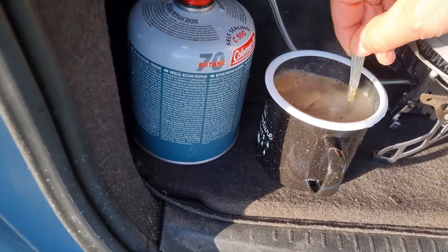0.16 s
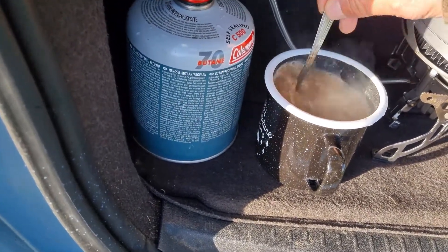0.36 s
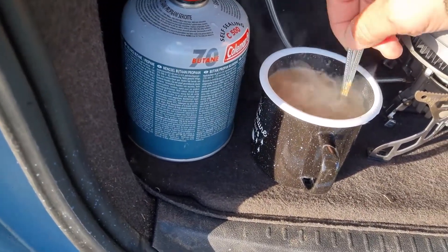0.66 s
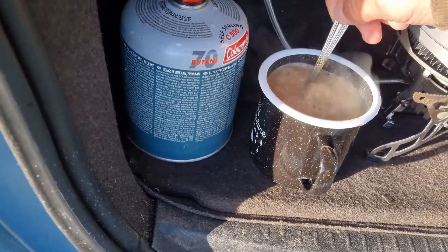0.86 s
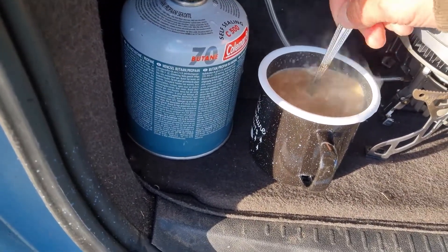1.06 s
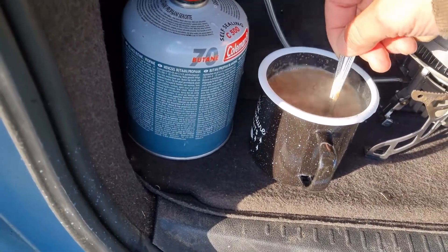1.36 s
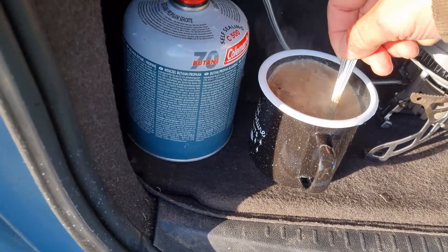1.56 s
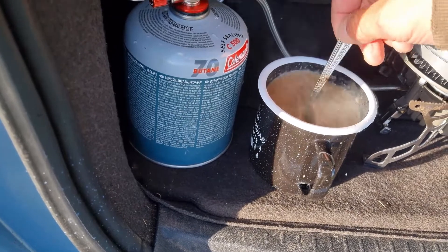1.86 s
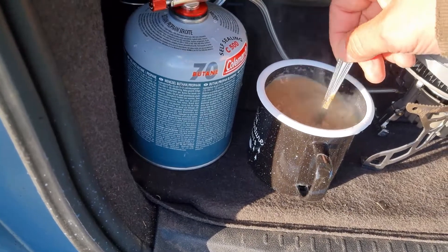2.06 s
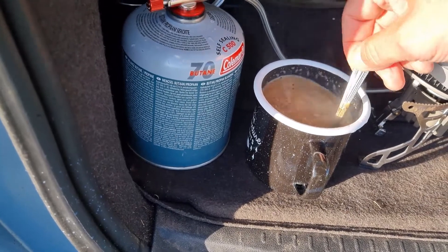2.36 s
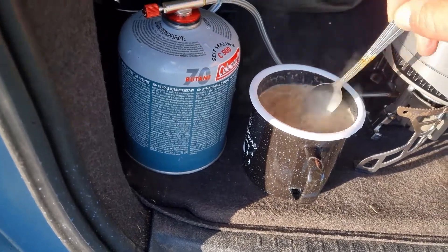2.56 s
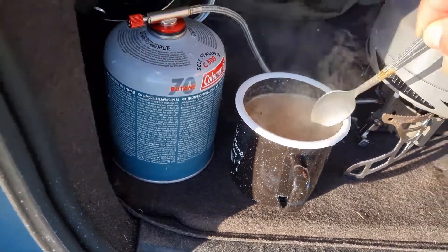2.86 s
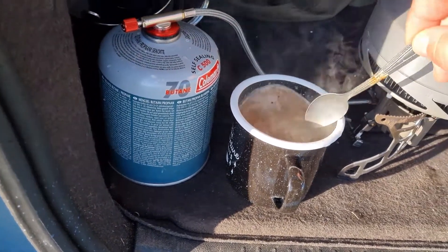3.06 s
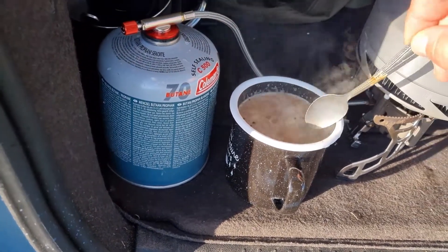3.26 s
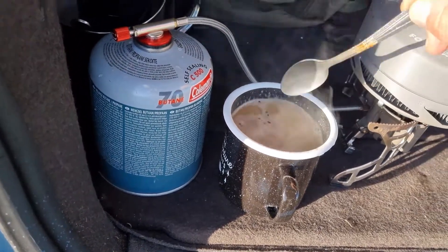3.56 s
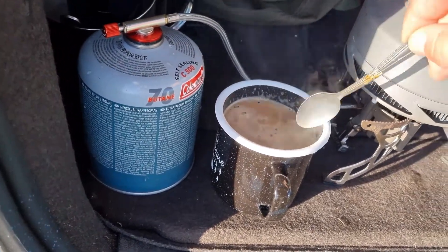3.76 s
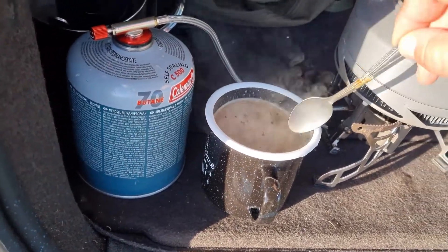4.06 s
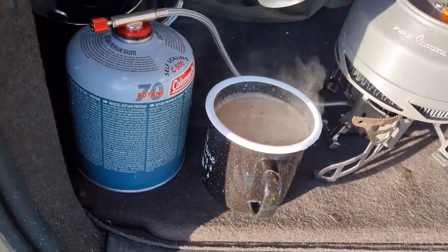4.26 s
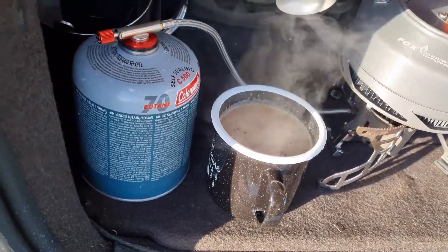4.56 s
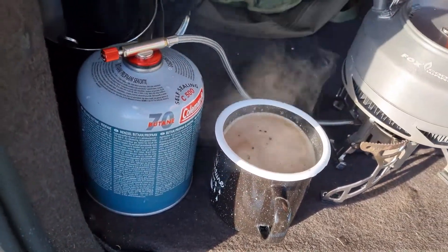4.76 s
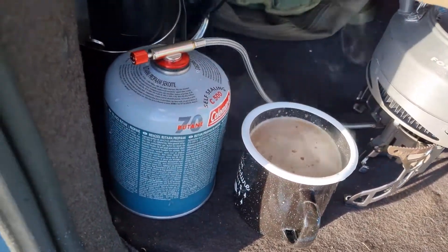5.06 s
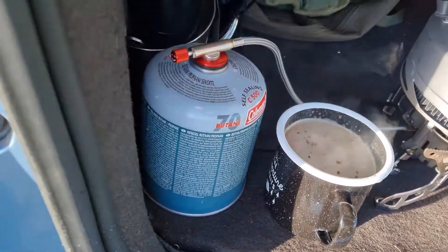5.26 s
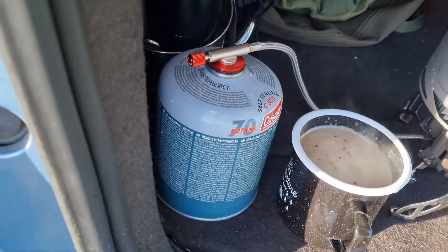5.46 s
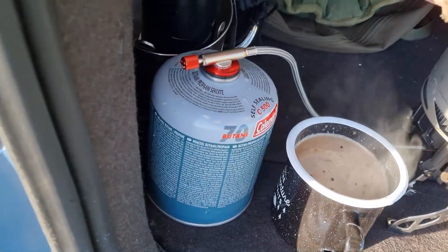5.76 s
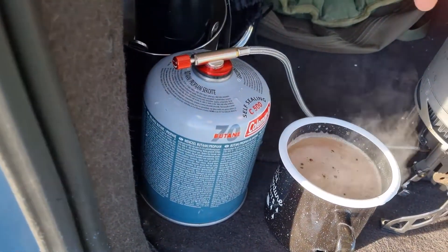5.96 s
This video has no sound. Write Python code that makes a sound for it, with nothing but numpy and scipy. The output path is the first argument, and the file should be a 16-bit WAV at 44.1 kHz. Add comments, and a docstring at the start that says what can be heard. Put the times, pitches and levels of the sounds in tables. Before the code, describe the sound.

Small dull ticks and scrapes of a spoon against a filled metal mug grow firmer over two seconds. Eight loud, bright cracks on the rim follow, first in a steady row, then more widely spaced, the mug ringing with a wavering note. Near the end a spoon clatters briefly on metal and rings thinly. Close stereo microphone, almost no reverberation, quiet outdoor air and low rumble.

```python
"""Spoon and enamel mug

A teaspoon stirs coffee in an enamel mug in the open boot of a car: brief damped contacts on the wall under the liquid.
Eight taps on the rim excite the mug's modes, whose pitch and decay time grow as the stirred-in bubbles clear.
The spoon then drops among metal cookware: bounces of noise and damped modes, then a rattle of random impacts.
The carpeted boot answers knocks and taps with short decaying noise; rumble, air and hiss are filtered noise."""
import sys
import numpy as np
from scipy import signal
from scipy.fft import rfft, irfft, next_fast_len
from scipy.io import wavfile
from scipy.ndimage import map_coordinates

SR = 44100
rng = np.random.default_rng(int(sys.argv[2]) if len(sys.argv) > 2 else 0)


def transcribe(signal):
    """Save signal, clipped to [-1, 1], as a 16-bit WAV file at the path in sys.argv[1]."""
    frames = np.atleast_2d(signal).T
    limited = np.clip(frames, -1, 1)
    pcm = np.round(limited * 32767).astype(np.int16)
    wavfile.write(sys.argv[1], SR, pcm)


N = 270324
T = np.arange(SR) / SR  # seconds after a blow
NOW = np.arange(N) / SR  # seconds into the scene

# Levels in the tables are relative: each source also applies its own gain.
# Spoon on the wall while stirring. Each row: start in seconds, contact level in dB, edge in dB (positive for
# the thin edge, negative for the flat back), spoon pitch in Hz, spoon ring in dB over the contact level.
WALL_KNOCKS = [(0.0138, -25.5, 2, 1890, 3), (0.2478, -19.5, 12.5, 3050, -13),
               (0.6629, -27.5, 11.5, 2086, 5), (0.7323, -30, -4.5, 1300, -0.5),
               (1.0522, -21, -6.5, 2060, -8.5), (1.069, -33, 10, 1550, -12),
               (1.2354, -19.5, -8.5, 3400, -3.5), (1.2859, -22, 10, 2230, -16),
               (1.4246, -22.5, -8.5, 1680, -10), (1.4577, -15.5, 7, 1580, -5),
               (1.6381, -25.5, -0.5, 1850, -15), (1.6557, -12, 0, 1618, -2.5),
               (1.8535, -13.5, 4.5, 1465, -1), (1.8679, -16.5, 3.5, 1637, -7.5),
               (2.0818, -12, -2, 1763, -14), (2.397, -16, -0.5, 1558, 2.5), (2.4198, -22.5, 2.5, 1640, -10)]
# Spoon on the rim. Each row: start in seconds, contact level in dB, treble in dB over contact,
# spoon pitch in Hz, low ring in dB, high ring in dB.
RIM_TAPS = [(2.8071, -11, -6.5, 1510, -36.5, -52), (2.9943, -8.5, -6.5, 2168, -31.5, -38.5),
            (3.173, -10, -8.5, 1860, -41, -34), (3.3601, -6.5, -6.5, 1860, -27.5, -44.5),
            (3.728, -5, 3.5, 1960, -23, -31), (3.8631, -4.5, 5, 3160, -25.5, -48),
            (4.1629, -5, 5.5, 1090, -22.5, -34), (4.5004, -5, 0.5, 1144, -17, -32)]
# The mug's long modes. Each row: multiple of the oval mode's frequency, level in dB, share of its t60.
MUG_MODES = [(.94, -12, .35), (1, 0, 1), (1.047, -15, .85), (1.563, -18, .35), (1.887, -26, .3),
             (2.935, -30, .26)]
# The rim's bright pair. Each row: frequency in Hz, level in dB, t60 in seconds.
RIM_MODES = [(2965, 0, .15), (3120, -15, .08)]
# Short modes of spoon and mug in contact. Each row: frequency in Hz, level in dB, t60 in seconds.
CLANK_MODES = [(735, -2, .08), (920, -2, .04), (1140, -1, .05), (1480, -4, .04), (1860, -3, .045),
               (2250, -8, .035), (3040, 6, .03), (4400, -3, .03), (5110, -6, .03), (6130, -3, .03),
               (8300, 0, .025), (12200, -2, .025)]
# The dropped spoon's bounces. Each row: start in seconds, clash in dB, ring in dB, thud in dB.
BOUNCES = [(5.635, -28.5, -31, -64), (5.677, -29.5, -44.5, -62), (5.686, -23, -13.5, -42),
           (5.7217, -14.5, -11.5, -11.5), (5.757, -18, -22, -53), (5.769, -23, -24.5, -57),
           (5.823, -26, -20, -26)]
# Modes of the metal cookware. Each row: frequency in Hz, level in dB, t60 in seconds.
COOKWARE_MODES = [(1254, -10, 0.12), (1320, -18, 0.029), (1640, -4, 0.14), (2532, 3.5, 0.066),
                  (2830, 1.5, 0.11), (2940, -4.5, 0.1), (3720, 1, 0.15), (3783, 12, 0.06),
                  (4855, 3.5, 0.069), (6580, -15, 0.08), (7000, -11.5, 0.059)]
# Modes of the freely ringing spoon. Each row: frequency in Hz, level in dB, t60 in seconds.
SPOON_MODES = [(1400, -22, 0.18), (1556, -24, 0.19), (2745, -18, 0.27), (3332, -26, 0.12), (3612, -9, 0.12),
               (4194, -11, 0.2), (4409, -12, 0.2), (4624, -19, 0.24), (4904, -28, 0.5), (5383, -26, 0.22),
               (5626, -26, 0.2), (5674, -34, 0.27), (6309, -22, 0.27), (6923, -12, 0.23), (7208, -2, 0.045),
               (8323, -28, 0.13), (8775, -31, 0.14), (9265, -32, 0.25), (9868, -27, 0.19),
               (9959, -28, 0.13), (10160, -22, 0.083), (10800, -44, 0.28), (11350, -31, 0.11),
               (12490, -16, 0.076)]
# The spoon dragged over the bottom. Each row: frequency in Hz, level in dB, t60 in seconds.
GRIND_MODES = [(1780, 0.5, 0.069), (1940, 0, 0.035), (2830, -7.5, .02), (3040, -10, 0.036)]
# Strokes of the spoon over the bottom. Each row: start in seconds, length in seconds, level in dB.
BOTTOM_STROKES = [(0.105, 0.055, -58), (0.248, 0.015, -60.5), (0.762, .02, -59.5)]
# Plops, drips and light touches. Each row: start in seconds, level in dB, pitch in Hz,
# opening click in dB over that level.
LIQUID_TICKS = [(0.185, -41.5, 1820, -15), (0.236, -39.5, 510, -23), (.269, -40, 1180, -1.5),
                (0.833, -46.5, 3030, -19), (0.877, -47.5, 1340, -25), (1.094, -50, 1520, 1),
                (1.123, -54, 1880, -4), (1.268, -48.5, 3300, -12), (1.842, -34.5, 530, -6.5),
                (5.015, -64.5, 2000, 12.5), (5.096, -69.5, 1992, 14), (5.199, -54.5, 5420, -9),
                (5.273, -67.5, 2430, 8)]
# Decay of the car boot. Each row: frequency in Hz, t60 in seconds.
BOOT_DECAY = [(200, 0.059), (1500, .09), (5000, 0.059), (15000, 0.033)]
# Course of the rumble. Each row: time in seconds, level in dB.
RUMBLE_COURSE = [(0.0, -55), (0.51, -57), (1.6, -48), (1.93, -58), (2.27, -56.5), (3.46, -63.5),
                 (4.4, -58.5), (4.93, -66.5), (5.75, -65), (6.13, -66.5)]
# Course of the murmuring air. Each row: time in seconds, level in dB.
AIR_COURSE = [(0, -56.5), (.9, -64.5), (2.6, -69), (4.4, -73.5), (5.8, -74.5), (6.13, -68.5)]

# Noise spectra. Each row: frequency in Hz, relative density in dB per Hz.
# Low outdoor rumble, with the columns above.
RUMBLE_SPECTRUM = [(12, -39.5), (20, -11), (43, -1), (75, 6.5), (129, -5.5), (168, -21), (220, -15),
                   (290, -50), (480, -120)]
# Soft moving air, same columns.
AIR_SPECTRUM = [(60, -20), (150, 4), (300, 0.5), (600, -7.5), (1200, -15), (2500, -42), (5000, -40.5),
                (16000, -52.5)]
# Steady hiss, same columns.
HISS_SPECTRUM = [(300, -0.5), (1500, 0.5), (4300, -7.5), (5500, -13), (10000, -17.5), (16000, -18.5)]
# Liquid washing round the spoon, same columns.
WASH_SPECTRUM = [(300, -18.5), (600, 6.5), (1200, 3.5), (2000, -2.5), (4000, -15.5), (6500, -28),
                 (15000, -33.5)]
# Contact of spoon and wall, same columns.
CONTACT_SPECTRUM = [(150, -21), (500, -13.5), (900, -1), (1700, 5), (3000, 1), (4500, -7), (8000, -19),
                    (16000, -57.5)]
# Scratch of the spoon's edge, same columns.
SCRATCH_SPECTRUM = [(1500, -55), (3500, -10), (5000, 4), (8000, 2.5), (14000, 0), (16000, -5)]
# Crack of spoon on rim, same columns.
CRACK_SPECTRUM = [(100, -32), (450, -25), (650, -6), (850, 4.5), (1100, -4.5), (1400, -5.5), (2000, -1),
                  (3000, -2), (5000, -0.5), (8000, -5.5), (11000, -8.5), (15000, -7.5), (16200, -20.5)]
# Mug on the carpet, same columns.
THUMP_SPECTRUM = [(40, -12), (100, 1.5), (180, -1.5), (330, -12), (600, -25), (2000, -49.5)]
# Metal on metal, same columns.
CLASH_SPECTRUM = [(200, -22.5), (700, -20.5), (1200, 6), (2000, 0.5), (4000, 3.5), (7000, 2), (10000, 0),
                  (15500, -2), (16300, -31)]
# Low body of a bounce, same columns.
THUD_SPECTRUM = [(80, -24.5), (200, -14), (430, -25.5), (600, 8.5), (800, -5), (1200, 1.5), (2000, -7),
                 (5000, -22.5), (16000, -52.5)]

TOP_HZ = 16500  # band limit of the whole scene
RADIATE_HZ = 480  # the small mug radiates little below this
CRACK_T60 = .012  # s, metal-on-metal crack
TICK_T60 = .036  # s, pitched part of a tick
# a harder knock is brighter: scratch at a full-scale contact (dB), its growth in dB per dB of contact
SCRATCH_DB, SCRATCH_GROWS = 6, 1.84
# the wall's ring over the contact (dB), and its loss in dB per dB of edge
WALL_DB, WALL_LOSS = -7.5, 1
# clank and the spoon's own note (dB over contact); thump on the carpet (dB over the low ring)
CLANK_DB, SPOON_DB, THUMP_DB = -19.5, -18, -22
# second touch: delay in s, dB over contact, dB lost per dB of treble as a crisp tap lifts off cleanly
REBOUND_S, REBOUND_DB, REBOUND_LOSS = .0095, -18, 1.2
# the oval mode climbs and rings longer as bubbles clear: values at the first tap, growth per second
OVAL_HZ, OVAL_HZ_PER_S = 801.5, 10.5
RING_T60, RING_T60_PER_S = 0.25, 0.2
# sloshing coffee bends that note: bend in Hz at a full-scale ring, sloshes a second, time constant in s
SLOSH_BEND_HZ, SLOSH_HZ, SLOSH_S = 70, 3.3, .35
STROKE_ATTACK_S, STROKE_RELEASE_S = 0.054, 0.041  # exponential time constants
# the swirl holds its effort (dB) until a given second, then falls
SWIRL_DB, SWIRL_HOLD_S, SWIRL_FALL_DB_PER_S = -69.5, 3.7, 45
# the rattle starts just after the heaviest bounce, loses energy steadily and stops dead
RATTLE_START_S, RATTLE_STOP_S, RATTLE_DB, RATTLE_FALL_DB_PER_S = 5.728, 5.884, -23, 20.5
BOUNCE_RING_DB = -29  # every bounce sets the spoon itself ringing
# faint random drips: how many, middle pitch in Hz, middle relative level in dB
DRIP_COUNT, DRIP_HZ, DRIP_DB = 9, 2000, -59.5


def amp(db):
    """Amplitude is ten to the power of the level over 20 dB."""
    return 10 ** (np.asarray(db) / 20)


def unit(x):
    """Dividing by the root mean square gives unit power."""
    return x / np.sqrt(np.mean(x ** 2) + 1e-20)


def along(points, hz):
    """Linear interpolation of (Hz, value) points on a logarithmic frequency axis."""
    f, v = np.transpose(points)
    return np.interp(np.log(hz + 1), np.log(f + 1), v)


def course(rows):
    """Linear interpolation of (s, value) rows, one value per sample."""
    s, value = np.transpose(rows)
    return np.interp(NOW, s, value)


def wobble(rate):
    """Spline interpolation of random knots, rate a second, gives a smooth random curve."""
    knots = rng.standard_normal(int(N * rate / SR) + 4)
    return map_coordinates(knots, [NOW * rate])


def add(track, s, sound):
    """Superposition: a sound is mixed in at s seconds."""
    part = track[:, round(s * SR):][:, :sound.shape[-1]]
    part += sound[..., :part.shape[-1]]


def pair(size, alike):
    """Sum and difference of two noises give two channels of a chosen correlation."""
    a, b = rng.standard_normal((2, size))
    u = np.arccos(np.clip(alike, -1, 1)) / 2
    return np.cos(u) * a + np.sin(u) * np.array([b, -b])


def colour(x, spectrum, treble_db=0):
    """Minimum-phase filtering through a folded cepstrum, with a treble shelf rising from 2.5 to 5 kHz."""
    m = 2 * next_fast_len(x.shape[-1] // 2 + 2048)
    hz = np.fft.rfftfreq(m, 1 / SR)
    shelf_db = treble_db * along([(2500, 0.2), (5000, 0.97)], hz)
    cepstrum = irfft(np.log(amp(along(spectrum, hz) + shelf_db)))
    # folding the later half onto the earlier makes the filter causal
    cepstrum[1:m // 2] *= 2
    cepstrum[m // 2 + 1:] = 0
    return irfft(rfft(x, m) * np.exp(rfft(cepstrum)), m)[:, :x.shape[-1]]


def burst(spectrum, t60, alike, treble_db=0):
    """A crowd of short modes acts as decaying coloured noise, with the energy of its envelope."""
    fade = amp(-60 * T[:SR // 5] / t60)
    x = colour(pair(len(fade), alike) * fade, spectrum, treble_db)
    return x * np.linalg.norm(fade) / np.linalg.norm(x, axis=1, keepdims=True)


def ring(modes, scatter_db, spread, clock=T):
    """Modal superposition: damped sines, each with its own strength and phase in either channel."""
    out = np.zeros((2, SR))
    for hz, db, t60 in modes:
        gain, phase = rng.standard_normal((2, 2, 1))
        n = min(int(1.5 * abs(t60) * SR) + 1, SR)
        envelope = amp(db + scatter_db * gain - 60 * T[:n] / t60)
        out[:, :n] += envelope * np.sin(2 * np.pi * hz * clock[:n] + spread * phase)
    return out


def through(x, response):
    """Convolution: x drives a resonant body of unit energy."""
    body = response / np.linalg.norm(response, axis=1, keepdims=True)
    return signal.fftconvolve(x, body, axes=1)[:, :N]


def soften(x, rise):
    """An exponential approach to full strength, with time constant rise in seconds."""
    return x * (1 - np.exp(-T[:x.shape[1]] / rise))


def contacts(rate_hz, spread_db):
    """A random impulse train: tiny impacts of uneven size and either sign, rms 1."""
    struck = rng.random((1, N)) < rate_hz / SR
    sign = rng.choice([-1, 1], N)
    return unit(struck * sign * amp(spread_db * rng.standard_normal(N)))


def radiate(x):
    """Small bodies radiate low frequencies poorly: a second-order high-pass."""
    return signal.sosfilt(signal.butter(2, RADIATE_HZ, "highpass", fs=SR, output="sos"), x)


def boot(x, wet_db):
    """Reverberation of a small carpeted space: noise whose decay time depends on frequency."""
    hz, t, z = signal.stft(rng.standard_normal((2, SR // 7)), SR, nperseg=128)
    decay = amp(-60 * t / along(BOOT_DECAY, hz)[:, None])
    tail = signal.istft(z * decay, SR, nperseg=128)[1]
    tail *= 1 - np.exp(-(T[:tail.shape[1]] / 0.0056) ** 2)  # gradual onset
    tail /= np.linalg.norm(tail[0])
    return x + amp(wet_db) * signal.fftconvolve(x, tail, axes=1)[:, :x.shape[1]]


def outdoors():
    """Broadband ambience as filtered noise: uneven low rumble, soft moving air and a faint steady hiss."""
    rumble_gain = amp(course(RUMBLE_COURSE) + 3.5 + 2.3 * wobble(16))
    rumble = rumble_gain * unit(colour(pair(N, alike=0.51), RUMBLE_SPECTRUM))
    rumble *= amp([[2], [-2]])  # stronger in the first channel
    air_gain = amp(course(AIR_COURSE) + 3.5 + 2.1 * wobble(18))
    air = air_gain * unit(colour(pair(N, alike=0.49), AIR_SPECTRUM))
    hiss = amp(-73.0) * unit(colour(pair(N, alike=0.26), HISS_SPECTRUM))
    return rumble + air + hiss


def ticks():
    """Narrow-band decay: plops, drips and touches click and tick, with random drips while the spoon stirs."""
    out = np.zeros((2, N))
    last_knock = WALL_KNOCKS[-1][0]
    drips = [(last_knock * when, DRIP_DB + 3 * (size - .5), DRIP_HZ * 2 ** (pitch - .5), 0)
             for when, size, pitch in rng.random((DRIP_COUNT, 3))]
    for s, db, hz, click_db in LIQUID_TICKS + drips:
        peak = [(hz / 4, -36), (hz / 1.3, -15), (hz, 0), (hz * 1.3, -15), (hz * 2, -30), (hz * 8, -50)]
        add(out, s, amp(db + 1.5) * burst(peak, TICK_T60, alike=0.26))
        add(out, s, amp(db + click_db) * burst(CONTACT_SPECTRUM, CRACK_T60, alike=0.22))
    return out


def swish():
    """Stick-slip friction: tiny slips on the bottom excite short modes while the liquid washes round."""
    effort = amp(SWIRL_DB - SWIRL_FALL_DB_PER_S * np.maximum(NOW - SWIRL_HOLD_S, 0))
    for s, length, db in BOTTOM_STROKES:
        before = np.maximum(s - NOW, 0) / STROKE_ATTACK_S
        after = np.maximum(NOW - s - length, 0) / STROKE_RELEASE_S
        effort = effort + amp(db) * np.exp(-before - after)
    # squaring lets the tip bite mainly in the hardest strokes
    bite = effort ** 2 / effort.max()
    slips = contacts(rate_hz=250, spread_db=4)
    grind = through(bite * slips, ring(GRIND_MODES, scatter_db=1.5, spread=1.0))
    wash = unit(colour(pair(N, alike=0.37) * amp(4 * wobble(180)), WASH_SPECTRUM))
    return grind + amp(-5) * effort * wash


def dropped_spoon():
    """Repeated impact: hard bounces on metal, then a fast rattle that stops and lets the spoon ring out."""
    out = np.zeros((2, N))
    for s, clash_db, ring_db, thud_db in BOUNCES:
        clash = amp(clash_db) * burst(CLASH_SPECTRUM, t60=0.14, alike=0)
        cookware = amp(ring_db - 8.5) * ring(COOKWARE_MODES, scatter_db=0.0, spread=0.93)
        spoon = amp(BOUNCE_RING_DB) * ring(SPOON_MODES, scatter_db=-3.5, spread=1)
        thud = amp(thud_db - 1.5) * burst(THUD_SPECTRUM, t60=0.077, alike=0.7)
        add(out, s, soften(clash, rise=0.0004))
        add(out, s, soften(cookware, rise=0.0029))
        add(out, s, soften(spoon, rise=0.001))
        add(out, s, soften(thud, rise=0.00088))
    strength = amp(RATTLE_DB - RATTLE_FALL_DB_PER_S * np.maximum(NOW - RATTLE_START_S, 0))
    rattling = (NOW > RATTLE_START_S) * (NOW < RATTLE_STOP_S)
    # hundreds of tiny contacts a second, each striking the same metal
    chatter = contacts(rate_hz=450, spread_db=3) * strength * rattling
    out += amp(-1.5) * through(chatter, burst(CLASH_SPECTRUM, CRACK_T60, alike=0))
    out += amp(0.5) * through(chatter, burst(CLASH_SPECTRUM, t60=0.098, alike=0))
    out += amp(-3.5) * through(chatter, ring(COOKWARE_MODES, scatter_db=2, spread=1.0))
    out += amp(-9.5) * through(chatter, ring(SPOON_MODES, scatter_db=1, spread=0.91))
    return out


def stirring():
    """Contact damping: the pressed spoon and wall ring only briefly; its edge scratches, its back booms."""
    out = np.zeros((2, N))
    for s, db, edge_db, hz, ring_db in WALL_KNOCKS:
        knock = amp(db - 5) * burst(CONTACT_SPECTRUM, t60=0.026, alike=0.2)
        scratch_db = SCRATCH_DB + SCRATCH_GROWS * db + edge_db
        knock += amp(scratch_db) * burst(SCRATCH_SPECTRUM, t60=0.0082, alike=0.067)
        wall = ring([(954, 1.0, 0.035), (1052, 1, 0.027)], scatter_db=3.5, spread=1.0)
        spoon = ring([(hz, 0, .027)], scatter_db=1, spread=.6)
        body = amp(db + WALL_DB - WALL_LOSS * edge_db) * wall + amp(db + ring_db) * spoon
        body = soften(body, rise=0.00084)[:, :knock.shape[1]]
        add(out, s, boot(soften(knock, rise=0.00054) + body, wet_db=-20.0))
    return out


def rim_taps():
    """Free vibration after impact: the spoon cracks, touches again, thumps the mug down and lets it ring."""
    out = np.zeros((2, N))
    for s, db, treble_db, spoon_hz, low_db, high_db in RIM_TAPS:
        crack = amp(db) * burst(CRACK_SPECTRUM, CRACK_T60, alike=0, treble_db=treble_db)
        rebound = burst(CRACK_SPECTRUM, CRACK_T60, alike=0, treble_db=treble_db)
        add(crack, REBOUND_S, amp(db + REBOUND_DB - REBOUND_LOSS * treble_db) * rebound)
        # the spot that is struck picks one of the spoon's own modes
        spoon = amp(db + SPOON_DB) * ring([(spoon_hz, 0, .045)], scatter_db=2.2, spread=.6)
        clank = amp(db + CLANK_DB) * ring(CLANK_MODES, scatter_db=3.0, spread=1.0)
        touching = (clank + spoon)[:, :crack.shape[1]]
        add(out, s, boot(soften(crack + radiate(touching), rise=0.00041), wet_db=-12.5))
        add(out, s, amp(low_db + THUMP_DB) * burst(THUMP_SPECTRUM, t60=0.12, alike=.7))

        settled = s - RIM_TAPS[0][0]  # seconds since the first tap
        slosh = SLOSH_BEND_HZ * amp(low_db) * np.exp(-T / SLOSH_S) * np.sin(2 * np.pi * SLOSH_HZ * T)
        oval_hz = OVAL_HZ + OVAL_HZ_PER_S * (settled + T) - slosh
        cycles = np.cumsum(oval_hz) / SR
        t60 = RING_T60 + RING_T60_PER_S * settled
        modes = [(multiple, level, share * t60) for multiple, level, share in MUG_MODES]
        wall = amp(low_db) * ring(modes, scatter_db=3.0, spread=.15, clock=cycles)
        # a wide swing of the thin wall adds the octave, growing as the square of the ring
        octave_modes = [(2, 0.0022, 0.19)]
        octave = amp(2 * low_db + 3.5) * ring(octave_modes, scatter_db=5.5, spread=.4, clock=cycles)
        rim = amp(high_db) * ring(RIM_MODES, scatter_db=2.0, spread=.6)
        add(out, s, soften(radiate(wall) + octave + rim, rise=.002))
    return out


def scene():
    """Linear superposition of all sources."""
    return outdoors() + ticks() + swish() + dropped_spoon() + stirring() + rim_taps()


def record(dry):
    """Saturation rounds off peaks near full scale, then a steep low-pass limits the band."""
    held = dry / (1 + dry ** 6) ** (1 / 6)
    m = next_fast_len(N + SR // 2)
    hz = np.fft.rfftfreq(m, 1 / SR)
    return irfft(rfft(held, m) / (1 + (hz / TOP_HZ) ** 120), m)[:, :N]


dry = scene()
out = record(dry)
transcribe(out)
```